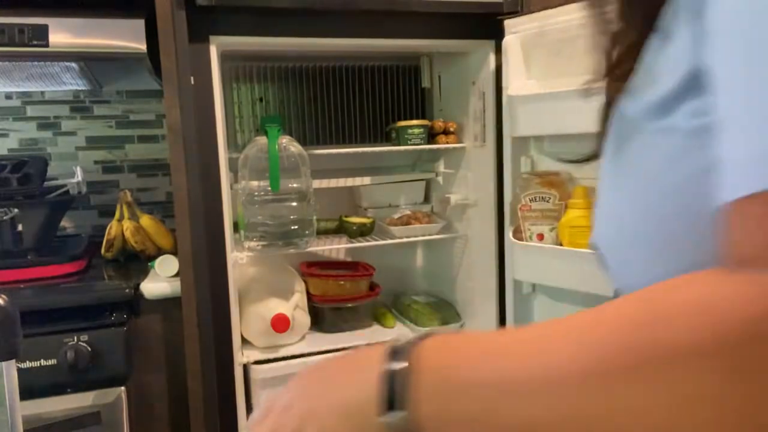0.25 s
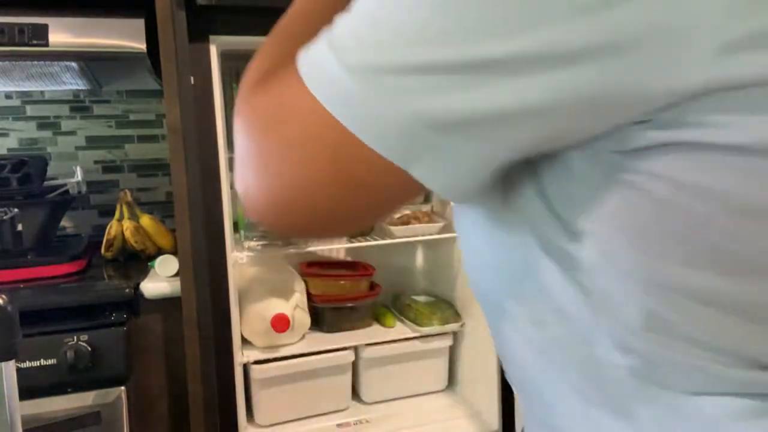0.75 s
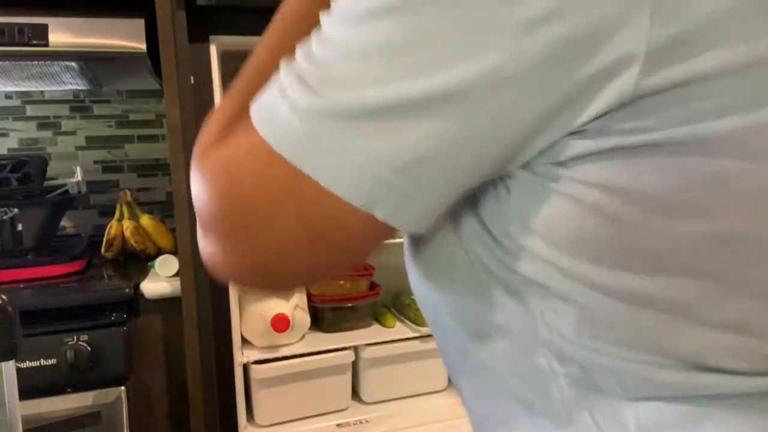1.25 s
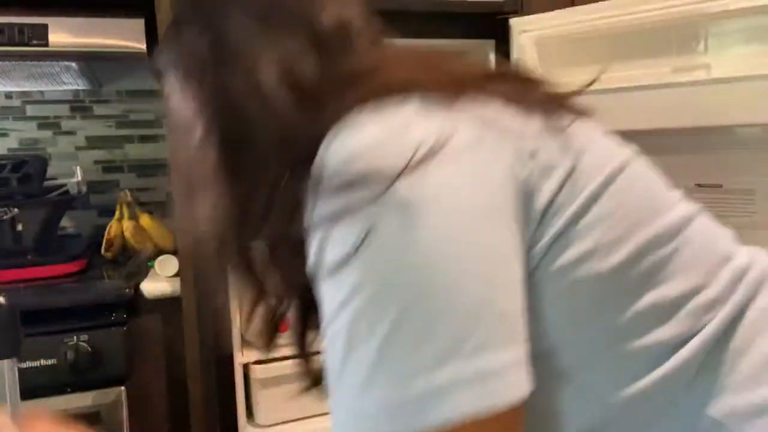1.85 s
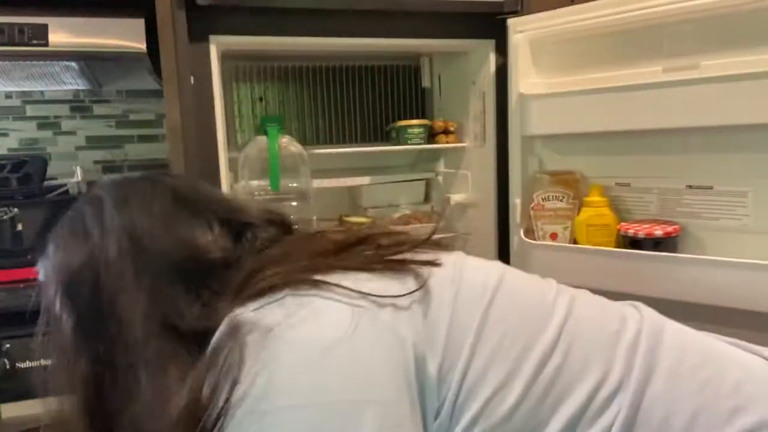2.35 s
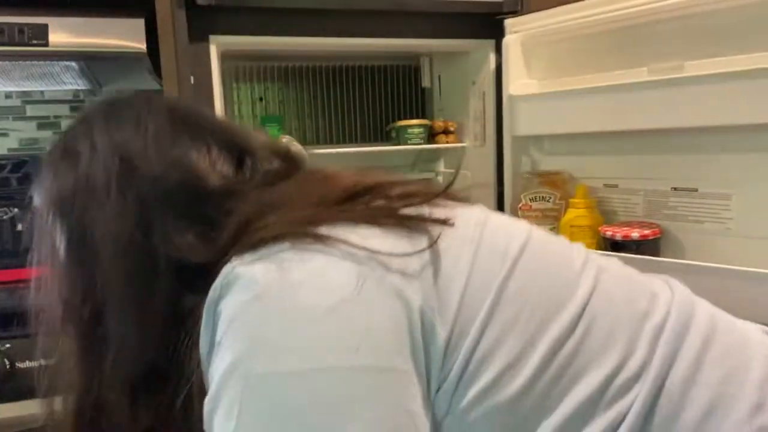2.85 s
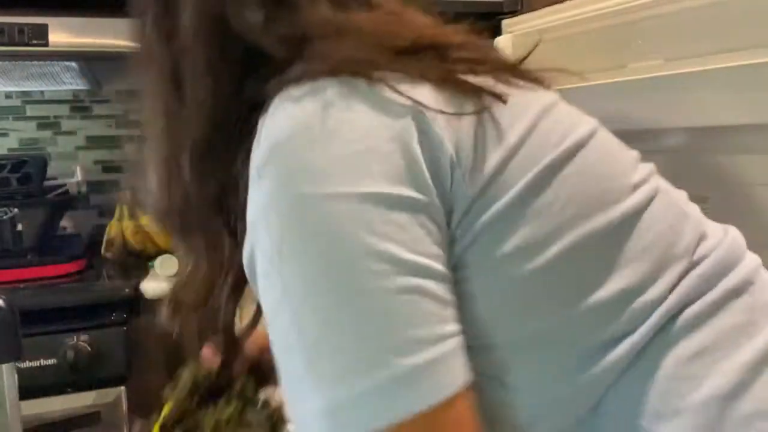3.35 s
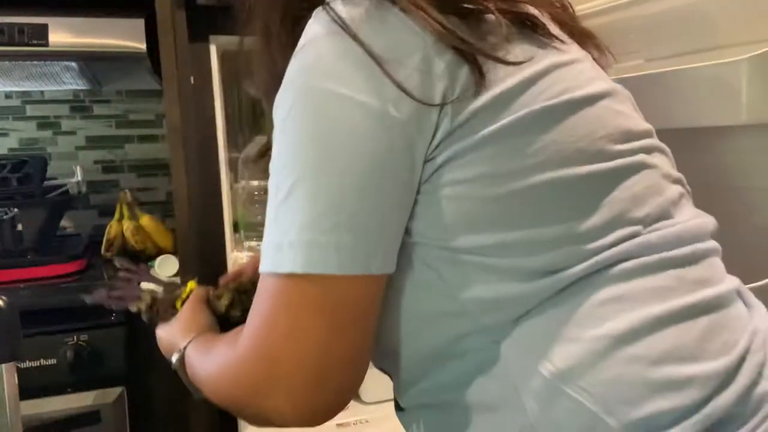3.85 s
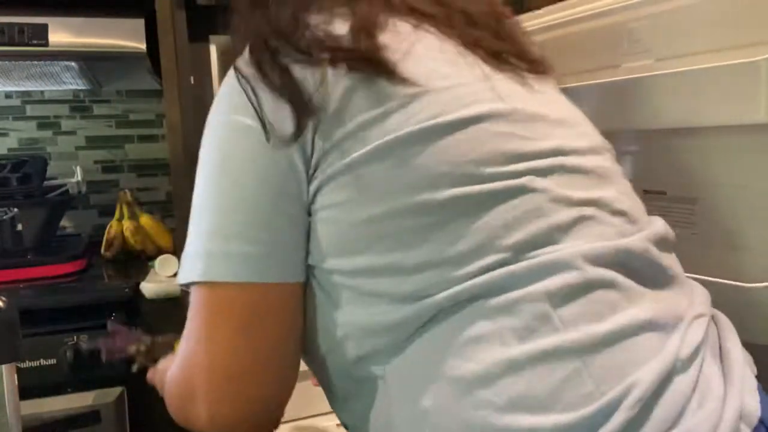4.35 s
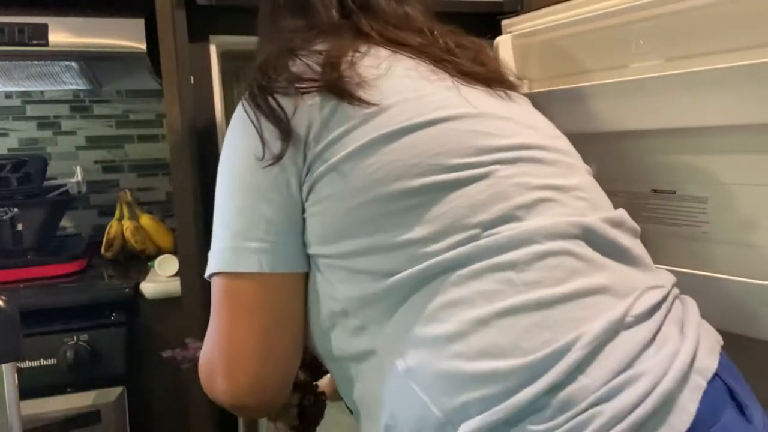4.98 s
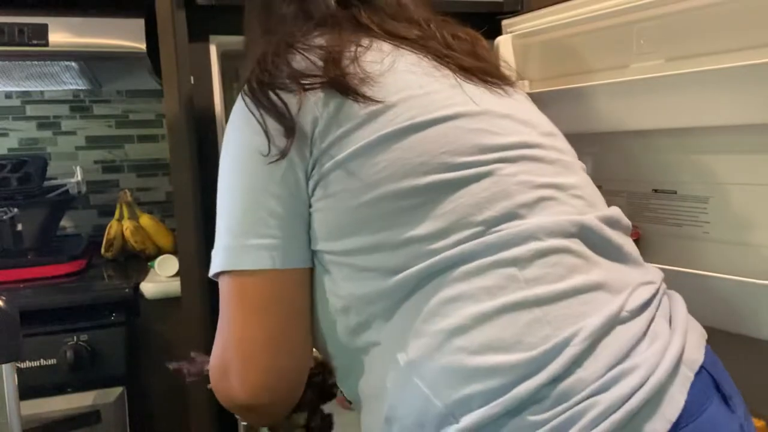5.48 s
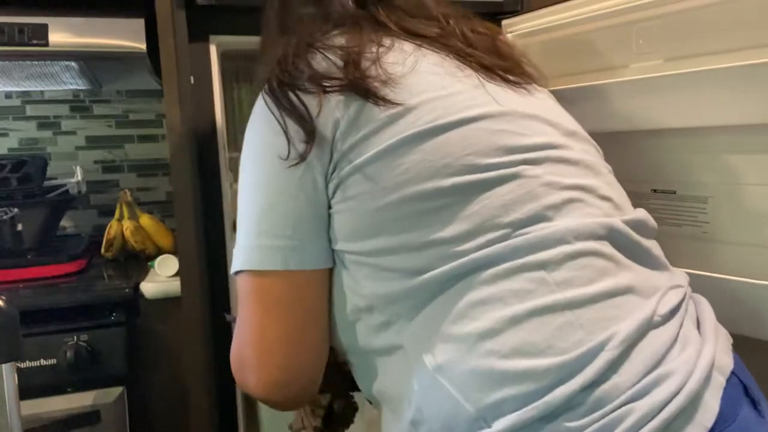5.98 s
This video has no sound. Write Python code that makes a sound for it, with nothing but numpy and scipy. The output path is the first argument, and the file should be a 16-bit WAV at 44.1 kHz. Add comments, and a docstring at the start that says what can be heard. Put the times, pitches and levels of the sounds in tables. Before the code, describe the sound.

An open refrigerator hums continuously for about six and a half seconds: low steady motor tones, a boxy resonance around 150 to 400 hertz and soft fan air, wide in stereo and slightly wavering. Handling is nearly inaudible at first, with a faint swish at 0.7 s, a dull low brush at 2.0 s, tiny very high crinkles between 2.4 and 3.0 s, and faint rubbing until 3.6 s. Cloth brushes and three soft low floor bumps come from 4.1 to 4.5 s. A light tick at 4.54 s precedes the loudest burst, 4.75 to 4.92 s: a plastic drawer rattles in rapid hollow knocks with a bassy thud. At 5.2 to 5.3 s a tub scuffs and taps more lightly, with a soft rustle after. At 6.13 to 6.18 s a container clunks onto a shelf, hollow and quick, and decays into the hum. Close pickup, small hard room.

```python
"""A small kitchen: an open refrigerator hums, with steady compressor tones and fan air ringing in the cabinet.
Someone leans in, rustles faintly among the food and shifts their weight (filtered noise, low bumps);
then a plastic drawer rattles, a tub scuffs along a shelf and a container is knocked down on it.
Contacts are sums of decaying modes with dense clatter and a thud; scuffs are trains of tiny slips."""
import sys
import numpy as np
from scipy import signal
from scipy.fft import rfft, irfft
from scipy.io import wavfile
from scipy.ndimage import uniform_filter1d

SR = 44100
rng = np.random.default_rng(int(sys.argv[2]) if len(sys.argv) > 2 else 0)


def waveform_to_disk(signal):
    """Save audio, clipped to [-1, 1], as 16-bit WAV at the path in sys.argv[1]."""
    frames = np.transpose(np.atleast_2d(signal))
    scaled = np.clip(frames, -1, 1) * 32767
    samples = np.round(scaled).astype(np.int16)
    wavfile.write(sys.argv[1], SR, samples)


N = 274302


def amp(db):
    """Level definition: decibels to amplitude gain."""
    return 10 ** (np.asarray(db) / 20)


def unit(x):
    """Power normalisation: scales to rms 1."""
    return x / np.sqrt(np.mean(abs(x) ** 2) + 1e-20)


def read(points, hz):
    """Interpolates a spectrum linearly over log frequency."""
    f, value = np.transpose(points)
    return np.interp(np.log(hz + 1), np.log(f + 1), value)


def add(mix, s, sound):
    """Superposition: sums a stereo sound into the mix from time s."""
    part = mix[:, round(s * SR):][:, :sound.shape[1]]
    part += sound[:, :part.shape[1]]


def ears(phase):
    """Interaural phase: half the angle (rad) leads at left, half lags at right."""
    return np.exp(.5j * np.array([[1], [-1]]) * phase)


def random_bins(shape):
    """Gaussian noise spectrum: independent complex bins of mean power 1."""
    return (rng.standard_normal(shape) + 1j * rng.standard_normal(shape)) / np.sqrt(2)


def drift(rate_hz):
    """Low-pass random process: slow fluctuation of rms 1 and zero mean."""
    hz = np.fft.rfftfreq(N, 1 / SR)
    spectrum = random_bins(len(hz)) * np.exp(-(hz / rate_hz) ** 2) * (hz > 0)
    return unit(irfft(spectrum, N))


def dying_noise(ring_time, count):
    """Diffuse decay: dense stereo echoes, each band falling 60 dB in its own t60."""
    hz, t, z = signal.stft(rng.standard_normal((2, count)), SR, nperseg=256)
    decay = np.exp(-np.log(1000) * t / read(ring_time, hz)[:, None])
    return signal.istft(z * decay, SR, nperseg=256)[1][:, :count]


def knock(body, ring_db, clatter_db, bright, thud_db, thud_hz, rise_s=0.00045, build_s=0.0016,
          wander=0.43, spread=0.61, detune=0.012, swell_cycles=1.0, thud_t60=0.12):
    """Modal excitation: a contact rings the body, clatters round the compartment and thuds into the cabinet."""
    # modes of the things that are knocked: f/Hz, relative level/dB, t60/s
    drawer = [(154, 3.5, 0.068), (271.5, 2.5, 0.16), (416, -1, 0.16), (477, -5.5, 0.13), (531, -5, 0.09),
              (651, -8, 0.12), (740, -11, 0.1), (855, -6.5, 0.14), (920, -5, .1), (995, -9, 0.1),
              (1160, -13.5, 0.17), (1260, -8, .08), (1537, -6.5, 0.07), (1714, -13, 0.07),
              (2196, -17, 0.05)]
    tub = [(149, -9, 0.15), (295, 0, 0.14), (343, -8, 0.093), (408, 4.5, 0.12), (670, -6, 0.12),
           (907, -4, 0.17), (1250, -10, 0.068), (1452, -4.5, 0.096), (1565, -14, 0.076), (2130, -15, 0.07)]
    # modes of the container on its shelf: f/Hz, relative level/dB, t60/s
    shelf = [(293, 13.5, 0.088), (380, -3, 0.043), (445, 9, 0.1), (532, -0.5, 0.09), (668, -7, 0.17),
             (784, -8.5, 0.14), (904, -6, 0.12), (1033, -5, 0.1), (1180, -8.5, 0.059), (1300, -14.5, 0.09),
             (1620, -17, .08), (1890, -19, 0.056), (2073, -15, 0.064), (2283, -15.5, 0.091)]
    # dense clatter of the plastic walls: f/Hz, relative spectral level/dB
    wall_spectrum = [(60, -27), (130, -18), (290, 4), (450, 2.5), (600, 0), (900, -1.5), (1200, -11),
                     (1700, -10.5), (2500, -14.5), (4500, -25), (7500, -32), (10000, -50), (12000, -33.5),
                     (14000, -49)]
    # ring time of the compartment: f/Hz, t60/s
    ring_time = [(150, 0.041), (500, 0.2), (2000, 0.11), (6000, 0.17), (13000, 0.1)]

    def tilt(f):
        """Contact stiffness: a harder contact tilts the spectrum to the treble by bright dB per octave."""
        return amp(bright * np.log2(np.clip(f, 200, 6000) / 600))

    count = 16384
    t, hz = np.arange(count) / SR, np.fft.rfftfreq(count, 1 / SR)
    bodies = {"drawer": drawer, "tub": tub, "shelf": shelf}
    mode_hz, mode_db, t60 = np.transpose(bodies[body])[:, :, None]

    # each blow lands a little elsewhere and under another grip: the modes wander in phase and pitch
    spot, left, right, grip = rng.standard_normal((4, len(mode_hz), 1))
    phase = wander * np.sqrt(mode_hz / 400) * (spot + np.array([left, right]))
    sign = (-1) ** np.arange(len(mode_hz))[:, None]
    swing = sign * np.sin(2 * np.pi * mode_hz * (1 + detune * grip) * t + phase)
    # a mode swells over its own cycles, so the bass arrives after the treble
    swell = 1 - np.exp(-t * mode_hz / swell_cycles)
    decay = np.exp(-np.log(1000) * t / t60)
    modes = (amp(mode_db) * tilt(mode_hz) * swell * decay * swing).sum(1)

    colour = unit(amp(read(wall_spectrum, hz))) * tilt(hz)
    mid, side = irfft(rfft(dying_noise(ring_time, count)) * colour)
    clatter = np.array([mid + spread * side, mid - spread * side])
    # echoes between the walls take a moment to pile up
    clatter = clatter * (1 - t / t[-1]) * (1 - np.exp(-t / build_s))

    thud = np.sin(2 * np.pi * thud_hz * t) * np.exp(-np.log(1000) * t / thud_t60)
    blow = amp(ring_db) * modes + amp(clatter_db) * clatter + amp(thud_db) * thud
    return blow * (1 - np.exp(-t / rise_s))


def scuff(body, length, db, bright, slips_per_s=380, uneven_db=10, clatter_db=-2,
          rise_s=0.0069, release_s=0.027):
    """Sliding friction of plastic on plastic: many tiny uneven slips keep the body's modes ringing."""
    t = np.arange(int(length * SR)) / SR
    chance, size = rng.random((N, 2))[:len(t)].T
    slips = (chance < slips_per_s / SR) * amp(uneven_db * size)
    slips = unit(slips - slips.mean())
    slips = slips * np.minimum(t / rise_s, 1) * np.minimum((length - t) / release_s, 1)
    response = knock(body, 0, clatter_db, bright, -np.inf, 0)  # no thud
    response = response / np.linalg.norm(response[0])
    return amp(db) * signal.fftconvolve(slips[None], response, axes=1)


def swish(length, db, centre_hz, octaves=0.61):
    """Soft friction: a band of noise, Gaussian over log frequency, swells and fades."""
    count, hz = int(length * SR), np.fft.rfftfreq(SR, 1 / SR)
    band = np.exp(-(np.log2((hz + 1) / centre_hz) / octaves) ** 2 / 2)
    rub = irfft(random_bins((2, len(hz))) * band)[:, :count]
    # adding the mean makes left and right more alike
    return amp(db) * unit(rub + rub.mean(0)) * signal.windows.hann(count)


def step(db, floor_hz=62, decay_s=0.015):
    """Damped low resonance: the floor gives a soft bump."""
    t = np.arange(SR // 3) / SR
    swell = t / decay_s * np.exp(1 - t / decay_s)
    return amp(db) * swell * np.sin(2 * np.pi * floor_hz * t) * np.ones((2, 1))


def crinkle(length, db, low_hz=10300, high_hz=13700, grain_db=3.2, clump_db=1.0):
    """Impulsive noise: tiny, very high snaps that come in uneven clumps."""
    count = int(length * SR)

    def sizes(size):
        """Exponential statistics: one random size, at most 3, held for each run of samples."""
        return np.repeat(np.minimum(rng.exponential(1, N // size), 3), size)[:count]

    snaps = rng.standard_normal((2, N))[:, :count]
    snaps = snaps * amp(grain_db * sizes(size=32) + clump_db * sizes(size=256))
    band = signal.butter(5, [low_hz, high_hz], "bandpass", fs=SR, output="sos")
    high = signal.sosfilt(band, snaps)
    return amp(db) * unit(high + high.mean(0)) * np.sin(np.linspace(0, np.pi, count))


def compressor(waver=0.11):
    """Periodic forcing: steady motor and mains tones that waver slightly in amplitude."""
    # compressor and mains tones: f/Hz, rms level/dB, phase between the ears/rad
    tones = [(26.9, -53.5, 0), (57.9, -42.5, 0.46), (114.8, -38.5, 0.36), (121.7, -53, 0.081),
             (143.2, -50.5, 0.54), (157.4, -40.5, 0.24), (171.8, -46, 0.22), (267.2, -52, 0.85),
             (371, -48, 0.36)]
    t = np.arange(N) / SR
    out = np.zeros((2, N))
    for hz, db, phase in tones:
        tone = np.exp(2j * np.pi * (hz * t + rng.random())) * (1 + waver * drift(1.4))
        out += np.sqrt(2) * amp(db) * (tone * ears(phase)).real
    return out


def fan(flutter_db=.5):
    """Turbulence and resonance: a broad rush of air, plus the cabinet modes that it excites."""
    # levels here stand ahead of the ripple of standing_waves()
    # rushing fan air: f/Hz, spectral level/dB per Hz
    air = [(20, -92), (36, -79), (48, -60), (68, -63), (85, -58), (125, -64), (210, -57), (400, -63.5),
           (550, -70), (900, -72), (2000, -77.3), (2700, -78.5), (3600, -81), (5500, -86), (7800, -87),
           (13000, -99), (14900, -106)]
    # the air's image: f/Hz, left-right likeness (0 to 1)
    air_same = [(40, 0.67), (200, 0.67), (500, 0.034), (1500, 0.11), (3000, 0.33), (5000, 0.049), (8500, 1),
                (12000, 1)]
    # the air's image: f/Hz, phase by which the left ear leads/rad
    air_phase = [(40, 0), (200, .25), (600, 1.3), (1200, 1.5), (2200, 3.1), (4000, 6.2), (6200, 6.5),
                 (8700, 9.3), (9900, 9.6), (11200, 12.5), (12900, 12.6), (13800, 15.6)]
    # resonances that the fan keeps ringing: f/Hz, width/Hz, rms level/dB, phase between the ears/rad
    cabinet = [(145.8, 9.8, -39.5, 0.8), (156.5, 18.3, -38.5, 0), (176.3, 17, -39.5, 0.27),
               (247.4, 20, -40.5, .5), (279, 29, -43.5, 2), (326, 31, -45.5, 1.5), (343.9, 21, -39.5, 0),
               (378.6, 25, -38.5, 0.78), (419, 25, -50, 2.5), (479, 23, -51.5, 1.5),
               (674.5, 41, -53.5, 0.5), (837, 40, -51, 1.5), (1039, 31, -56.5, 1.5), (1080, 44, -57, 3),
               (1279, 8.8, -54, 4), (1460, 70, -54, 1), (1690, 90, -56.5, 4.5), (2050, 120, -60, 4),
               (3336, 26, -62, 2)]

    hz = np.fft.rfftfreq(N, 1 / SR)
    common, other = random_bins((2, len(hz)))
    same = np.clip(read(air_same, hz), 0, .99)
    z = np.array([common, same * common + np.sqrt(1 - same ** 2) * other])
    z *= ears(read(air_phase, hz)) * amp(read(air, hz)) * np.sqrt(N * SR / 2)
    for centre, width, db, phase in cabinet:
        ringing = random_bins(len(hz)) / (1 + ((hz - centre) / width * 2) ** 4) ** .5
        z += amp(db) * np.sqrt(N) * unit(ringing) * ears(phase)
    return irfft(z, N) * amp(flutter_db * drift(17))


def standing_waves(x, ripple_db=2.5, smooth_bins=7, smooth_frames=24):
    """Interference: peaks and dips of the room's response drift as someone moves before the open door."""
    hz, t, z = signal.stft(x, SR, nperseg=4096)
    ripple = uniform_filter1d(rng.standard_normal(z.shape), smooth_bins, 1)
    ripple = uniform_filter1d(ripple, smooth_frames, 2)
    depth = ripple_db * hz / (hz + 400)  # long waves bend round the body
    gain = amp(depth[:, None] * (unit(ripple) - 1.41))  # the offset also lowers the mean level
    return signal.istft(z * gain, SR, nperseg=4096)[1][:, :N]


def kitchen(x, t60=0.37):
    """Reverberation: convolution with the short diffuse tail of a small hard room."""
    count = SR // 2
    build = 1 - np.exp(-np.arange(count) / SR / 0.0026)
    tail = dying_noise([(200, t60), (9000, 0.24)], count) * build
    return signal.fftconvolve(x, tail / np.linalg.norm(tail[0]), axes=1)[:, :N]


def scene():
    """Superposition: handling sounds and their reverberation over the running refrigerator."""
    # single contacts: t/s, what is struck, body ring/dB, wall clatter/dB, brightness/dB per octave,
    # low thud/dB, thud f/Hz
    knocks = [(4.544, "drawer", -38, -37, 3, -60, 130), (4.750, "drawer", -26, -23.5, 1, -34, 130),
              (4.756, "drawer", -20, -29, -3, -17, 111), (4.764, "drawer", -28, -25, -2.5, -12, 123.6),
              (4.796, "drawer", -28, -26.5, -0.5, -39, 141), (4.810, "drawer", -22, -28, -3, -37, 148),
              (4.824, "drawer", -26, -27.5, 4, -50, 145), (4.831, "drawer", -26, -25.5, -2, -25, 144),
              (4.845, "drawer", -23.5, -31, -1.5, -45, 150), (4.923, "drawer", -32, -30.5, -4.5, -50, 145),
              (5.199, "tub", -32, -33.5, 2.5, -48, 135), (5.226, "tub", -29, -32, -2, -36, 135),
              (5.247, "tub", -26, -29, -0.5, -38, 135), (5.2545, "tub", -26, -31, -5, -23, 136),
              (5.288, "tub", -37, -35, -9, -37, 160), (5.305, "tub", -40, -38, -10, -35, 160),
              (6.127, "shelf", -22, -27, 0.5, -40, 136), (6.132, "shelf", -32, -27.5, 4, -38, 135),
              (6.148, "shelf", -31, -30.5, 3, -42, 135), (6.156, "shelf", -28, -33, 3.5, -42, 135),
              (6.163, "shelf", -22.5, -32, 1, -16, 179), (6.180, "shelf", -38, -40, 4, -16, 185)]
    # containers dragging: t/s, what slides, length/s, level/dB before the fades, brightness/dB per octave
    scuffs = [(4.765, "drawer", .08, -31, 1.5), (5.199, "tub", 0.05, -31, 1),
              (5.25, "tub", 0.078, -35, 1.5)]
    # soft footfalls on the floor: t/s, peak level/dB
    steps = [(4.125, -30), (4.28, -30), (4.43, -27)]
    # faint crinkles among the food: t/s, length/s, rms level/dB before the fades
    crinkles = [(2.385, .012, -59), (2.43, .018, -55), (2.49, 0.26, -61), (2.6, 0.18, -56.5),
                (2.895, 0.13, -55.5)]
    # sleeves and packets brushing past: t/s, length/s, rms level/dB before the fades, centre f/Hz
    swishes = [(.66, 0.26, -53, 1500), (2.02, 0.16, -34.5, 257), (2.72, 0.35, -52, 2480),
               (3.2, 0.43, -53, 1190), (4.08, 0.17, -44, 670), (4.32, .18, -47, 900),
               (4.66, 0.082, -37, 830), (4.9, .2, -40.5, 604), (5.38, 0.17, -45, 990),
               (5.3, 0.37, -58, 3000)]

    hum = compressor() + standing_waves(fan())
    handling = np.zeros((2, N))
    sources = (knocks, knock), (scuffs, scuff), (steps, step), (crinkles, crinkle), (swishes, swish)
    for table, source in sources:
        for s, *row in table:
            add(handling, s, source(*row))
    balance = amp([[.15], [-.15]])  # left slightly louder than right
    return (hum + handling + amp(-8.5) * kitchen(handling)) * balance


def record(dry):
    """Linear filtering: a bass cut and an upper band limit."""
    bass_cut_hz, band_edge_hz = 22, 14900
    dry = signal.sosfilt(signal.butter(2, bass_cut_hz, "highpass", fs=SR, output="sos"), dry)
    band_limit = signal.firwin(511, band_edge_hz, window=("kaiser", 9), fs=SR)
    return signal.oaconvolve(dry, band_limit[None], "same")


dry = scene()
out = record(dry)
waveform_to_disk(out)
```